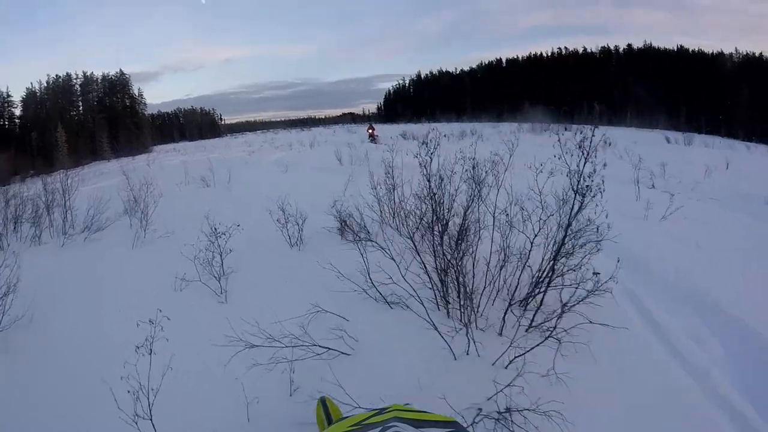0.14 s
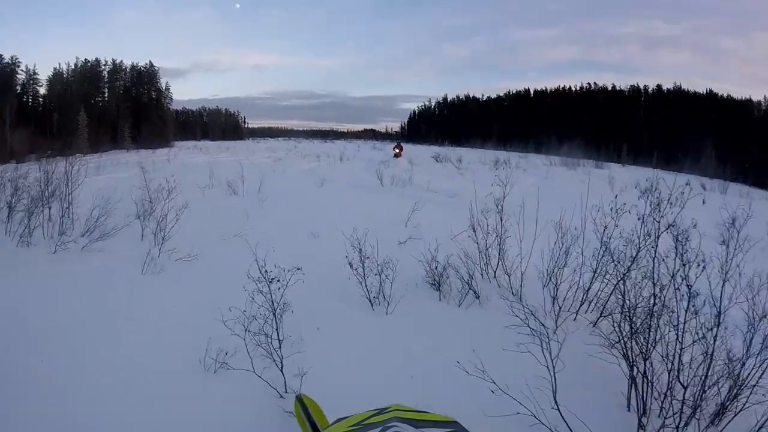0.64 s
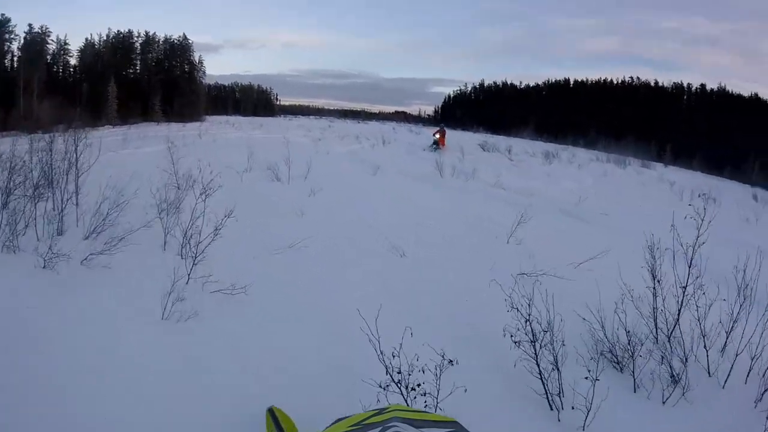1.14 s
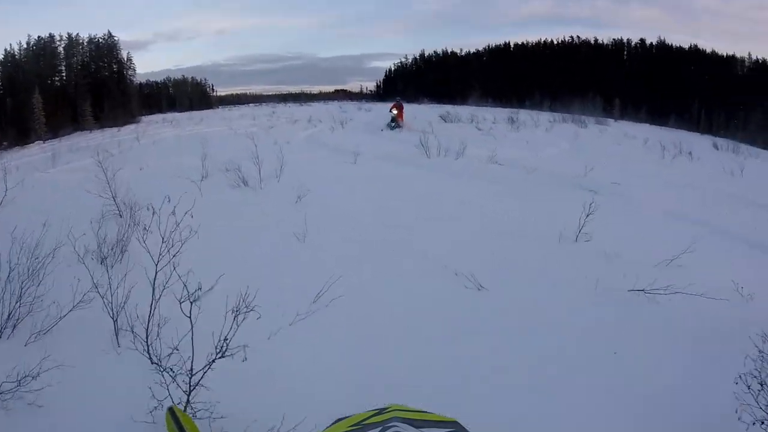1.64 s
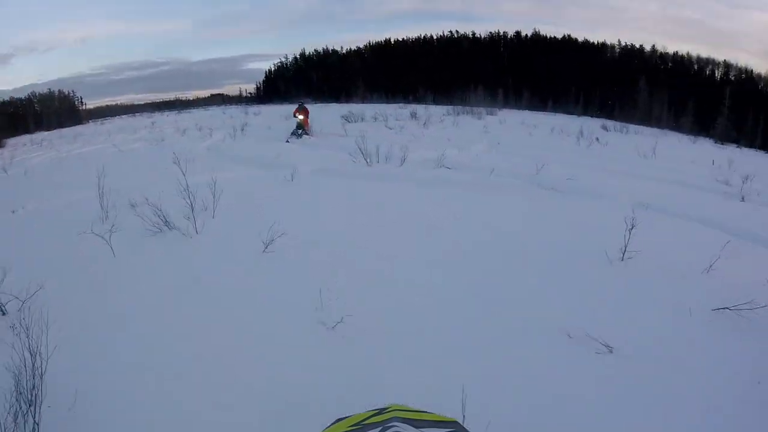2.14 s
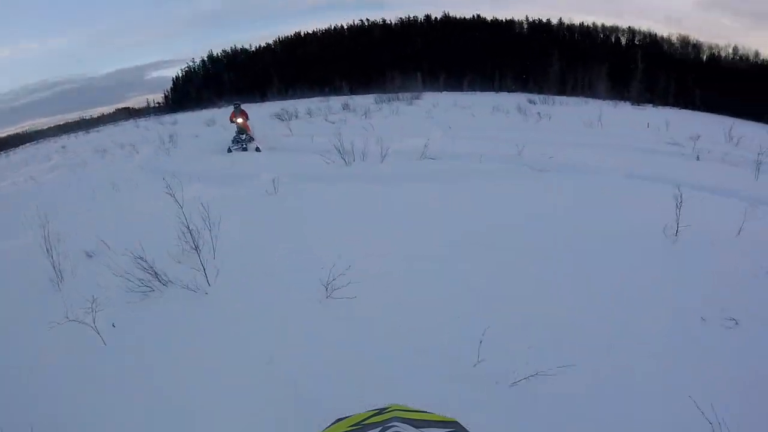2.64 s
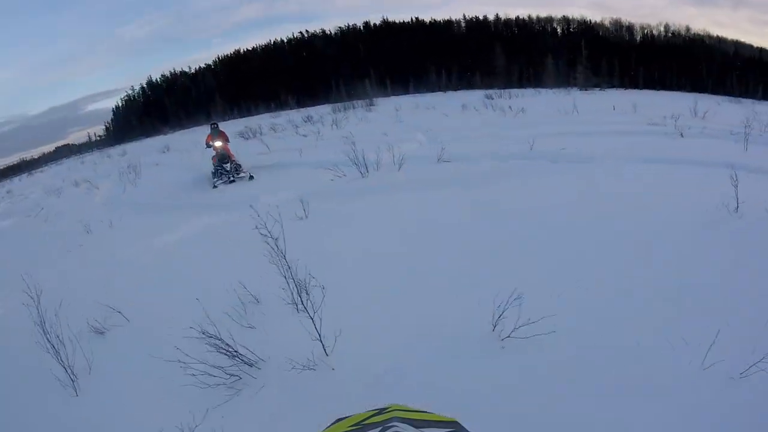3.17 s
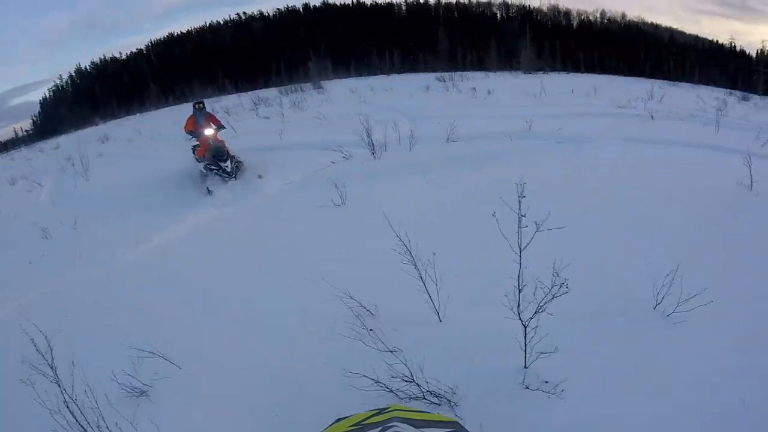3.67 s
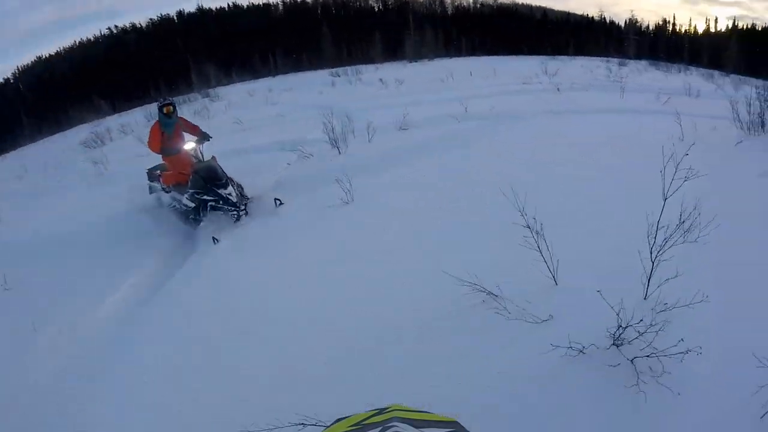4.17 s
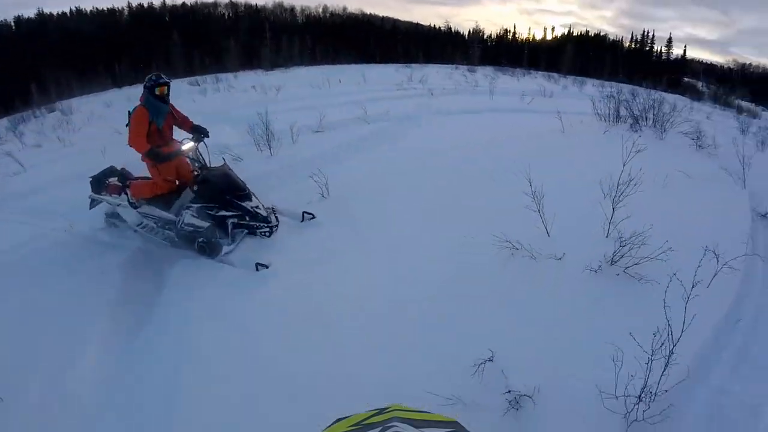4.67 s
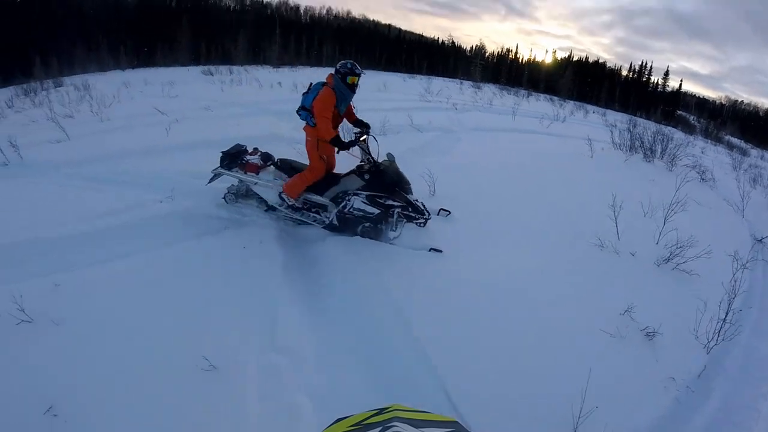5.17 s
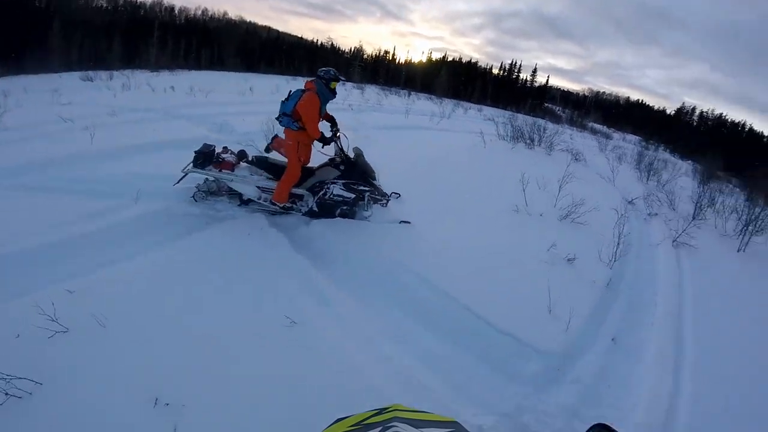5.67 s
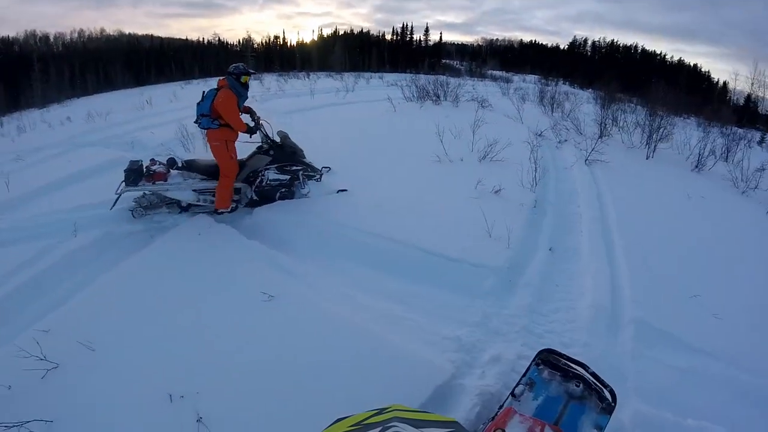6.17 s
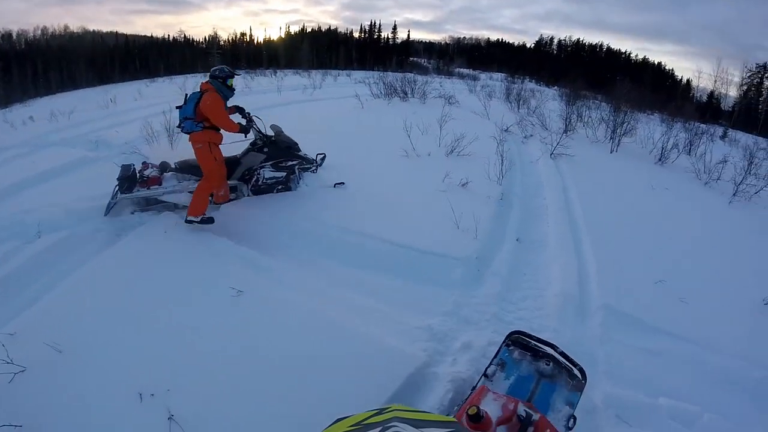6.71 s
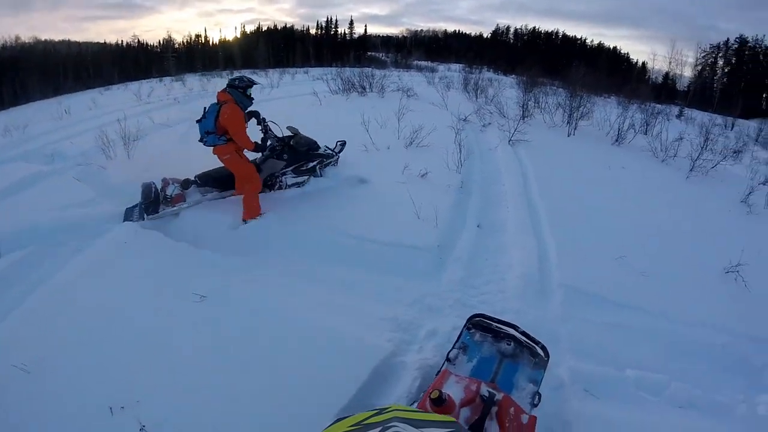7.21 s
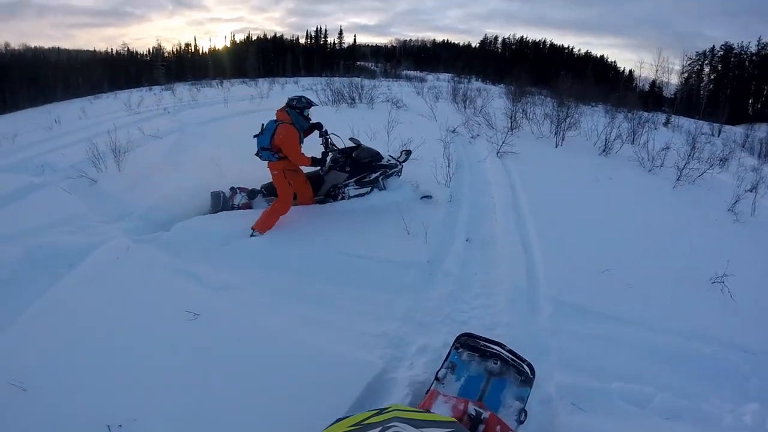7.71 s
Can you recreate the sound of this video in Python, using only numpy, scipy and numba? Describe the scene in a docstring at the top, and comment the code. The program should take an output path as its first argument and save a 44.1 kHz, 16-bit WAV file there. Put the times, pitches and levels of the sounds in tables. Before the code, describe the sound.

An outdoor ride on soft snow, heard from a cased microphone on the rider's helmet, nearly centred. From 0 to 4.9 s the rider's two-stroke engine is blipped again and again: longer swells at first, then quick stabs about every quarter second, each raspy rise falling back with dull, irregular exhaust thuds. Low body roar, churning snow and bright track hiss run beneath. Dry twigs snap and knock on the cowl, densest in the first second and around 1.8-2.5 s; a branch rubs roughly at 1.7-1.9 s. A second sled emerges faintly after 2.2 s, grows from 3.7 s and lugs in a deep drone around 4.3-4.7 s, then climbs. The rider's engine coasts down from 5 s to a low putter by 7.5 s, its track stopping near 6.3 s. At 6.1 s the other surges, reaching a hard raspy howl near 7 s and holding high while spinning track spray swells to the end.

```python
"""A two-stroke twin is blipped hard through brush while twigs snap and scrape on the cowl; snow and track hiss.
The rider's sled then sinks to idle; a second sled comes close, bogs down, surges and spins its track.
Both engines are sums of overtones locked to their revs, the rider's with random exhaust thuds; snow is shaped noise;
twigs and branch are noise rung through resonances. All is heard as by a cased microphone on the rider's
helmet, with the ring of the case near 5 kHz drawn into the colour of the hiss."""
import sys
import numpy as np
from scipy import signal
from scipy.fft import rfft, irfft
from scipy.io import wavfile
from scipy.ndimage import uniform_filter1d
from numba import njit

SR = 44100
rng = np.random.default_rng(int(sys.argv[2]) if len(sys.argv) > 2 else 0)


def invert_db(level):
    """Linear amplitude ratio for a level in decibels (20 dB per decade), elementwise."""
    return 10 ** (np.asarray(level, dtype=float) / 20)


def put_to_file(sound):
    """Save the sound as 16-bit audio at rate SR, in the file named by the first command-line argument."""
    columns = np.atleast_2d(sound).T  # one column per channel
    safe = np.clip(columns, -1, 1)
    whole_steps = np.round(safe * 32767)
    wavfile.write(sys.argv[1], SR, whole_steps.astype(np.int16))


N = 345303  # length [samples]
INERTIA_S = .03  # flywheel smoothing of the revs of both engines


def columns(table):
    """Draws every column after the time as a curve, one value a sample."""
    times, *cols = np.transpose(table)
    return [np.interp(np.arange(N) / SR, times, col) for col in cols]


def shape(hz, table):
    """Level [dB] of a spectrum at given frequencies, drawn over log frequency."""
    table_hz, table_db = np.transpose(table)
    return np.interp(np.log(hz), np.log(table_hz), table_db)


def power_db(*levels_db):
    """Level of unrelated sounds together: their powers add."""
    return 10 * np.log10(sum(invert_db(db) ** 2 for db in levels_db))


def unit(x):
    """Scales a sound to rms 1."""
    return x / np.sqrt(np.mean(x ** 2))


def walk(rate):
    """Random levels held 1 / rate seconds and slewed twice; spread near 1."""
    hold = max(int(SR / rate), 2)
    steps = np.repeat(rng.standard_normal(N // hold + 1), hold)
    return 1.55 * uniform_filter1d(uniform_filter1d(steps, hold), hold)[:N]


def hiss(table, flicker_db, rate):
    """Noise of a given spectrum at rms 1; three overlapping parts of the band flicker independently."""
    hz = np.arange(N // 2 + 1) * SR / N + 1e-3
    lo, hi = table[0][0], table[-1][0]
    # 54 dB per octave beyond both ends of the table
    outside_octaves = np.log2(np.maximum(lo / hz, 1) * np.maximum(hz / hi, 1))
    coloured = rfft(rng.standard_normal(N)) * invert_db(shape(hz, table) - 54 * outside_octaves)
    place = np.clip(np.log(hz / lo) / np.log(hi / lo), 0, 1)
    total = 0
    for k in range(3):
        part = irfft(coloured * np.maximum(1 - abs(2 * place - k), 0), N)
        total = total + part * invert_db(flicker_db * walk(rate))
    return unit(total)


@njit
def svf(x, hz, width):
    """State-variable band-pass, gain 1 at the centre."""
    y, band, low = np.empty(len(x)), 0., 0.
    g, damping = np.tan(np.pi * hz / SR), width / hz
    for i in range(len(x)):
        v = (band + g * (x[i] - low)) / (1 + g * (g + damping))
        band, low, y[i] = 2 * v - band, low + 2 * g * v, damping * v
    return y


def ring(x, hz, width):
    """A resonance with steep skirts: two equal band-passes in a row."""
    return svf(svf(x, hz, width), hz, width)


# throttle blips of the rider's engine: (throttle opens [s], firing rate then [Hz],
# throttle shuts [s], firing rate then [Hz], level of the thuds after it [dB])
BLIPS = [(-.1, 152, .05, 157.5, -18), (.3, 133, .54, 164, -13), (.74, 131.5, 1.29, 167.5, -20),
         (1.55, 154.7, 1.79, 166.3, -18), (2.02, 131, 2.21, 157.5, -15), (2.49, 120, 2.69, 152.5, -15),
         (2.79, 135, 2.97, 155, -16), (3.15, 125.5, 3.3, 140.5, -16), (3.41, 127.5, 3.55, 147.5, -14),
         (3.66, 131.5, 3.78, 145.5, -19), (3.91, 132, 4.08, 148, -13), (4.16, 134.5, 4.32, 154.5, -12),
         (4.42, 129.5, 4.6, 152.5, -11), (4.73, 129, 4.86, 144, -14)]
# coasting down to idle: (time [s], firing rate [Hz], level of the firing tone [dB])
COAST = [(5, 124.1, -27), (5.2, 112.4, -30), (5.4, 106.1, -20), (5.94, 94.9, -18.5), (6.39, 84.3, -19.5),
         (6.82, 69.14, -15), (6.96, 63.1, -16), (7.2, 71.7, -15), (7.33, 70.5, -15.5), (7.52, 61, -14),
         (7.83, 59.5, -19)]


def own_revs():
    """Firing rate: up while the throttle is open, down to the next blip, at last coasting."""
    blips, coast = np.array(BLIPS), np.array(COAST)
    times = np.append(blips[:, [0, 2]].ravel(), coast[:, 0])
    hz = np.append(blips[:, [1, 3]].ravel(), coast[:, 1])
    place = np.interp(np.arange(N) / SR, times, np.arange(len(times)))
    leg = np.minimum(place.astype(int), len(times) - 2)
    share = place - leg
    # revs climb fast at first
    share = np.where(hz[leg + 1] > hz[leg], 1 - (1 - share) ** 1.25, share)
    return uniform_filter1d(hz[leg] + share * (hz[leg + 1] - hz[leg]), int(INERTIA_S * SR))


# overtones of the rider's engine: (multiple of the firing rate, level against the leader of its group [dB])
OWN_ORDERS = [(.5, -13), (1, 0), (1.5, -14), (2, -16), (2.5, -23), (3, 0), (3.5, 3), (4, 0), (4.5, -13),
              (5, -6), (5.5, -14), (6, 0), (6.5, -5), (7, -2), (7.5, 2), (8, -6), (8.5, -9), (9, -3),
              (9.5, -10), (10, -1), (10.5, -12)]
# its exhaust, as the 3rd and 4th overtones sweep through it: (frequency [Hz], level [dB])
OWN_PIPE = [(180, -32), (250, -31), (375, -42), (400, -40), (430, -19.5), (465, -16), (495, -22),
            (590, -27), (620, -32.5), (665, -37)]


def own_overtones(hz, turns, shut, coasting):
    """Cosines locked to the firings, with half orders from unequal cylinders; a shut throttle starves them."""
    open_tone_db = -11 - 6.15 * np.sqrt(shut)
    tone_db = (1 - coasting) * open_tone_db + coasting * columns(COAST)[1]
    # short stabs at lower mean revs fill the pipe less: 0.25 dB per Hz
    stab_db = 0.25 * np.clip(152 - uniform_filter1d(hz, SR), 0, 12)
    third_db = shape(3 * hz, OWN_PIPE) - 6.8 * shut - stab_db
    fourth_db = shape(4 * hz, OWN_PIPE) - 7.5 - 9.5 * shut - 17 * coasting
    # the tuned pipe rasps only near full speed and under throttle
    rasp_db = -35 - 1.04 * np.maximum(158 - hz, 0) - 13.0 * shut
    out = 0
    for order, db in OWN_ORDERS:
        if order < 3:
            lead_db = tone_db
        elif order == 3:
            lead_db = third_db
        elif order < 6:
            lead_db = fourth_db
        else:
            lead_db = rasp_db
        waver_db = (.7 if order in (1, 3) else 1.8) * walk(30)
        wave = np.cos(2 * np.pi * order * turns - 0.896 * order ** 1.5)
        out = out + np.sqrt(2) * invert_db(db + lead_db + waver_db) * wave
    return out


def own_thuds(turns, shut, coasting):
    """A crank turn (two firings) fires or misses by chance and thumps the silencer near 80 Hz."""
    t = np.arange(N) / SR
    crank = np.flatnonzero(np.diff(np.floor(turns / 2)))
    kicks = np.zeros(N)
    kicks[crank] = rng.standard_normal(len(crank)) + 0.69
    thuds = unit(svf(svf(kicks, 80.0, 35.0), 80.0, 41.0))
    # the thuds trail the throttle by 29 ms and are 23 dB weaker when it is open
    late = t - 0.029
    blips = np.array(BLIPS)
    last_blip = np.maximum(np.searchsorted(blips[:, 2], late) - 1, 0)
    blip_db = blips[last_blip, 4] - 23 * (1 - np.interp(late, t, np.sqrt(shut)))
    # they calm down once it coasts; at idle they settle near -22 dB
    calming_db = 11 * np.exp(-np.maximum(t - COAST[0][0], 0) / 0.3)
    idle_db = -22 - 40 * (1 - coasting) + calming_db
    return invert_db(power_db(uniform_filter1d(blip_db, 900), idle_db)) * thuds


def own_engine():
    """The rider's twin: overtones of the firings, and thuds from stray firings off throttle."""
    hz = own_revs()
    turns = np.cumsum(hz * (1 + .0015 * walk(40))) / SR  # counted in firings
    last_shut_s = BLIPS[-1][2]
    coasting = np.clip((np.arange(N) / SR - last_shut_s) / (COAST[0][0] - last_shut_s), 0, 1)
    # a shut throttle shows as falling revs; 120 Hz per second is fully shut
    shut = np.clip(-uniform_filter1d(np.gradient(hz) * SR, 1300) / 120, 0, 1)
    engine = own_overtones(hz, turns, shut, coasting) + own_thuds(turns, shut, coasting)
    return engine, turns, shut


# own track slowing to a stop: (time [s], hiss level before throttle pull [dB])
TRACK = [(0, -38), (.9, -37.5), (1.2, -33.5), (1.6, -40.5), (2.1, -38.5), (4.3, -39), (4.65, -48.5),
         (5.9, -52.5), (6.3, -75)]
# bright thrown-snow hiss: the own track's until about 4.3 s, then the second sled's spinning track:
# (time [s], level [dB])
SPRAY = [(0, -36.5), (4.3, -41), (5.95, -45), (6.1, -39.5), (6.25, -48), (6.5, -42), (7, -31.5),
         (7.5, -28.5), (7.83, -23)]
# spectra, each scaled to rms 1 before its level: (frequency [Hz], relative density [dB per Hz])
ROAR = [(25, -12), (50, -7), (100, -2.5), (200, -9), (350, -14), (500, -14.5), (700, -33.5)]    # body roar
CHURN = [(500, 9), (800, 7), (1200, 8), (1700, 4.5), (2500, -5.5), (3500, -21.5)]  # churned snow
HISS = [(1650, -35.5), (2800, -35), (3140, -40), (4270, -13.5), (5220, 0.5), (5500, 4.5), (6100, -4.5),
        (7950, -5.5), (9510, -3), (10100, -9.5), (11100, -20.5), (14400, -62), (22000, -120)]    # track hiss
TOP = [(1290, -10.5), (2200, -5), (2830, -5.5), (3580, -9), (3860, -10), (4160, -14), (5340, 1),
       (6120, -17), (6770, -9), (8470, -19.5), (9900, -16.5), (11100, -27.5), (14400, -40), (22000, -120)]      # thrown snow


def snow(turns, shut):
    """Body roar, churned snow, track hiss and thrown snow; firings and crank turns puff the churn."""
    spray_db, = columns(SPRAY)
    other_hz, other_db, _ = columns(OTHER)
    # the own track bites under throttle
    track_db = columns(TRACK)[0] - (uniform_filter1d(shut, 4000) - .5)
    # the second sled churns with its revs
    other_churn_db = -35 + other_db + 0.1023 * (other_hz - 80)
    churn_db = power_db(track_db + 7, other_churn_db, spray_db - 0.5)
    hiss_db = power_db(track_db, spray_db - 19)
    # part of the roar dies as the own sled stops
    roar_db = power_db(-24.5, -20.5 + 0.21 * (track_db + 45))
    puff = 1 + 0.11 * np.cos(2 * np.pi * turns) + 0.12 * np.cos(np.pi * turns)
    grit = invert_db(0.93 * walk(300))  # ice grains
    roar = invert_db(roar_db) * hiss(ROAR, 1.5, 8)
    churn = invert_db(churn_db) * puff * hiss(CHURN, 1.1, 20)
    track_hiss = invert_db(hiss_db) * grit * hiss(HISS, 1.1, 25)
    thrown = invert_db(spray_db) * grit * hiss(TOP, 1.1, 30)
    return roar + churn + track_hiss + thrown


# twigs snapping on the cowl: (time [s], peak before the case dulls it [dB], centre [Hz],
# drive of the cowl's knock against the snap's [dB])
TWIGS = [(0.0493, -6.5, 9200, -11), (0.2391, -18, 8740, -12), (0.307, -33, 5040, -11),
         (0.3656, -8, 3860, 2), (0.3977, -23.5, 5050, -5), (0.4912, -14, 4760, -6),
         (0.5247, -17, 5400, -3.5), (0.603, -15, 8300, -4.5), (0.63, -23.5, 5500, -6),
         (0.8105, -19, 5400, 9), (0.829, -12.5, 5360, 3), (0.894, -18, 2216, -6), (0.9687, -17, 2330, -2),
         (1.793, -16, 2460, -13), (1.89, -6.5, 4800, 5), (1.9005, -20.5, 4864, -3.5),
         (1.953, -21, 5240, -4.5), (2.0624, -20, 5550, 3), (2.1156, -12, 5300, -7),
         (2.4236, -22, 9060, -11.5), (2.5374, -29, 5530, -12), (2.955, -20, 5520, -7.5),
         (3.6465, -24.5, 5440, -4.5)]


def twigs():
    """Each snap is a few ms of noise that swells and dies, in its own band, with a knock of the cowl."""
    t = np.arange(900) / SR
    burst = t / 0.00042 * np.exp(1 - t / 0.001) + 0.087 * np.exp(-t / 0.012)
    out = np.zeros(N + len(t))
    for time_s, db, hz, knock_db in TWIGS:
        crack = rng.standard_normal(len(t)) * burst
        snap = ring(crack, float(hz), 3500.)
        snap = snap + invert_db(knock_db) * ring(crack, 2030.0, 2500.0)
        start = int((time_s - .0003) * SR)
        out[start:start + len(t)] += invert_db(db) * snap / abs(snap).max()
    # the case dulls the top
    return signal.sosfilt(signal.butter(4, 10500, fs=SR, output="sos"), out[:N])


def scrape():
    """A branch dragged along the cowl catches and slips: a rough, stuttering rub in three resonances."""
    rub = rng.standard_normal(N) * invert_db(3.2 * walk(160))
    body = ring(rub, 850., 700.) + .3 * ring(rub, 2300., 1300.) + .55 * ring(rub, 5100., 900.)
    # from 1.66 s: grips in 50 ms, holds and swells for 100 ms, slips away in 90 ms
    times = 1.66 + np.cumsum([0, .05, .1, .09])
    swell_db = np.interp(np.arange(N) / SR, times, [-30, 0, 3, -35])
    return invert_db(-25.5 + swell_db) * unit(body)


# second engine: (time [s], crank rate [Hz], level of its 2nd to 6th overtones [dB], opening of its rasp [dB])
OTHER = [(2.2, 83.06, -23, -25), (2.4, 82, -18, -43), (2.9, 76.4, -12.5, -17), (3.05, 75.3, -30, -21.5),
         (3.6, 85.06, -27, -26), (3.75, 84.14, -11.5, -18), (4.05, 71.1, -5, -18), (4.3, 65, 2.5, -20),
         (4.45, 64.24, -3.5, -11), (4.52, 59.5, 0.5, -22), (4.72, 64.21, 1.5, -19), (5.01, 68.53, 2, -12),
         (5.31, 75.36, -1, -16.5), (5.52, 80.57, -0.5, -15), (5.84, 84.5, 0.5, -16),
         (5.93, 80.66, 0.5, -16), (6.02, 79.5, 0.5, -25), (6.11, 94.6, 2, -15), (6.2, 112.3, 3, -6.5),
         (6.27, 115.6, 1.5, -1.5), (6.34, 113.6, 2.5, -10.5), (6.44, 115.2, 1, 0), (6.61, 130.4, 0, 1.5),
         (6.72, 139.2, 2.5, 2), (6.87, 148.3, 0, 1), (6.96, 155, -2.5, 3), (7.06, 156.1, 0.5, -0.5),
         (7.31, 154.6, -1.5, -3), (7.65, 144.7, 0.5, -8), (7.83, 148.6, 0, -11.5)]
# its exhaust, chiefly for the crank tone and the overtones above the 6th: (frequency [Hz], level [dB])
OTHER_PIPE = [(60, -27), (85, -28), (112, -13.5), (135, -13), (150, -20), (158, -23.5), (450, -18.5),
              (570, -16.5), (680, -40), (780, -34), (850, -26), (930, -31), (1030, -53), (1140, -32),
              (1250, -33), (1330, -50), (1800, -47)]
# resonances of its silencer, rung by the 2nd to 6th overtone: (centre [Hz], width [Hz], level [dB])
SILENCER = [(155.4, 69.3, -13.5), (318.2, 81, -15.5), (382.2, 14.4, -19.5), (419.4, 22.7, -16.5),
            (466, 36.3, -14)]


def other_engine():
    """Overtones of the crank rate: exhaust colours the lowest and highest, silencer rings those between."""
    hz, level_db, rasp_db = columns(OTHER)
    hz = uniform_filter1d(hz, int(INERTIA_S * SR))
    turns = np.cumsum(hz * (1 + .001 * walk(30))) / SR
    arrive = np.clip((np.arange(N) / SR - OTHER[0][0]) / 0.086, 0, 1)
    # the 3rd and 5th overtones are weak while it lugs below a crank rate of 73 Hz
    odd_db = -20 * np.clip((73 - hz) / 7.6, 0, 1)
    out = 0
    for order in range(1, 15):
        tone_hz = order * hz
        db = shape(tone_hz, OTHER_PIPE) + rasp_db * (order > 1)
        if 2 <= order <= 6:
            rings = [top_db - 20 * np.log10(1 + (2 * (tone_hz - centre) / width) ** 2)
                     for centre, width, top_db in SILENCER]
            pipe_db = db - np.maximum(680 - tone_hz, 0) / 4
            db = power_db(*rings, pipe_db) + level_db + odd_db * (order % 2)
        if order == 4:
            # it also barks straight out of the pipe as the rasp opens
            db = power_db(db, -26.5 + rasp_db)
        db = db + .8 * walk(25)
        out = out + np.sqrt(2) * invert_db(db) * np.cos(2 * np.pi * order * turns - 0.717 * order ** 1.5)
    return arrive * out


def scene():
    """Bass is the same at both ports; above that the right port hears a little more."""
    engine, turns, shut = own_engine()
    mid = engine + snow(turns, shut) + twigs() + scrape() + other_engine()
    upper = signal.sosfiltfilt(signal.butter(2, 620, "high", fs=SR, output="sos"), mid)
    # right over left by 1.25 dB, and a faint copy shifted by 7.5 ms to set the ports apart
    lean = -upper * np.tanh(1.25 * np.log(10) / 40)
    side = lean + invert_db(-29) * np.roll(upper, 331)
    return np.array([mid + side, mid - side])


def mute_faint_treble(x):
    """Mutes narrow bands above 3 kHz, 8 bins wide, wherever the two channels' mean falls under a fixed level."""
    mute_db = -94.5  # per Hz
    hz, _, z = signal.stft(x, SR, nperseg=1024, scaling="psd")
    power = abs(z.mean(axis=0)) ** 2
    band = uniform_filter1d(power, size=8, axis=0)[4::8].repeat(8, axis=0)
    z[:, :512] *= (band > invert_db(mute_db) ** 2) | (hz[:512, None] < 3000)
    return signal.istft(z, SR, nperseg=1024, scaling="psd")[1][:, :N]


def band_limit(x):
    """A steep low-pass at the top of the band."""
    return signal.sosfilt(signal.butter(12, 14700, fs=SR, output="sos"), x)


def record(dry):
    """The loudest peaks are rounded and faint treble is muted."""
    rounded = 0.96 * np.tanh(0.95 * dry)
    mix = mute_faint_treble(rounded)
    return band_limit(mix)


dry = scene()
out = record(dry)
put_to_file(out)
```